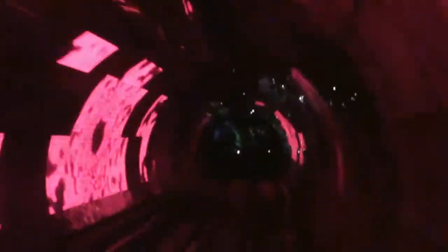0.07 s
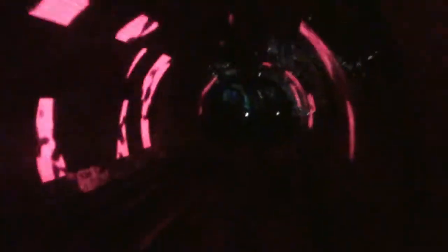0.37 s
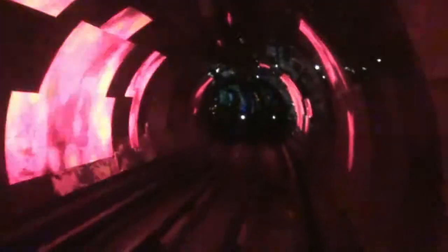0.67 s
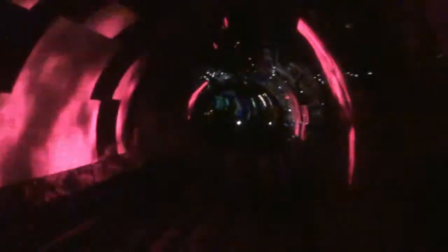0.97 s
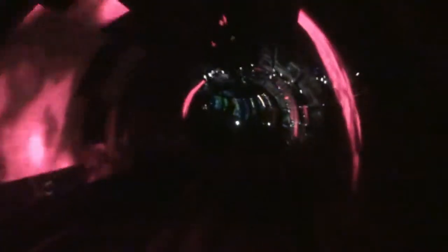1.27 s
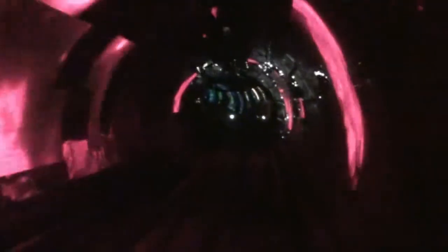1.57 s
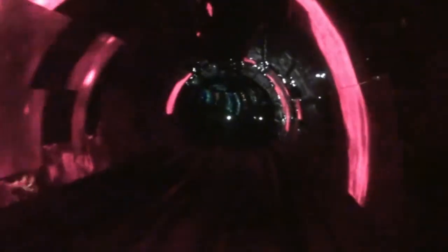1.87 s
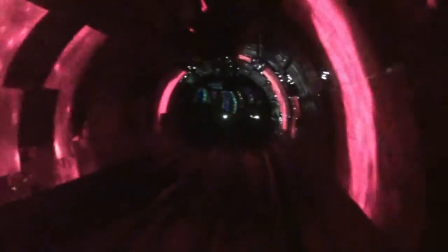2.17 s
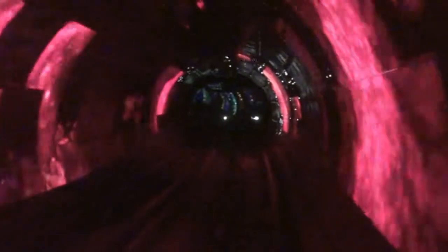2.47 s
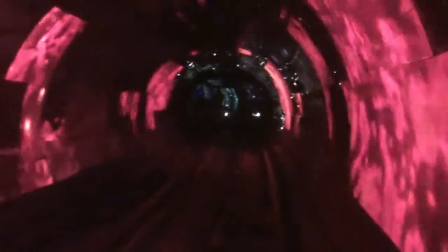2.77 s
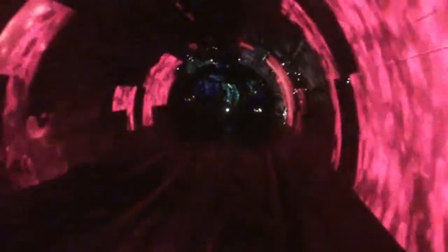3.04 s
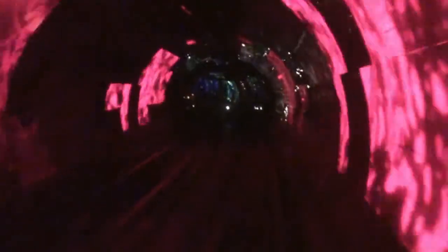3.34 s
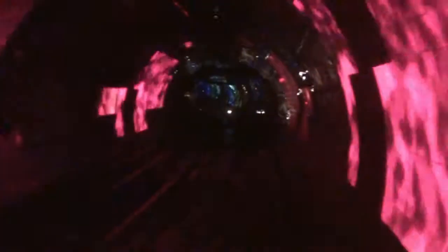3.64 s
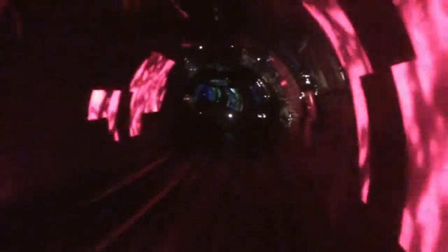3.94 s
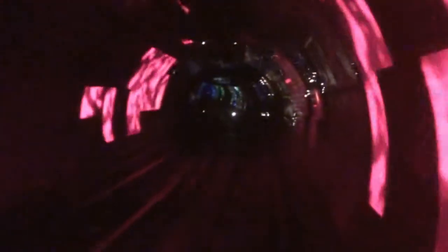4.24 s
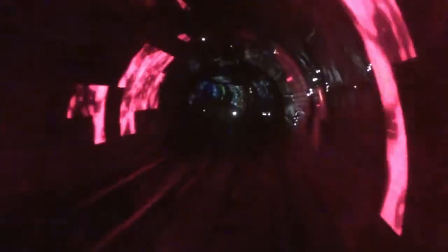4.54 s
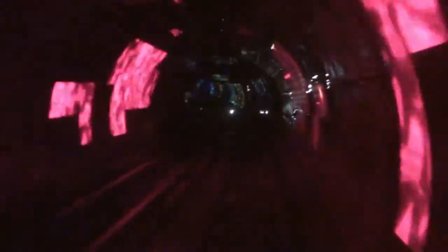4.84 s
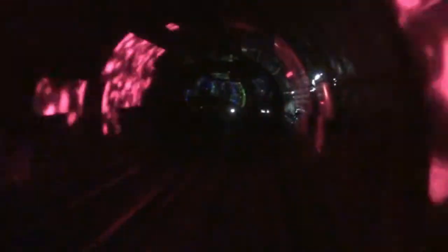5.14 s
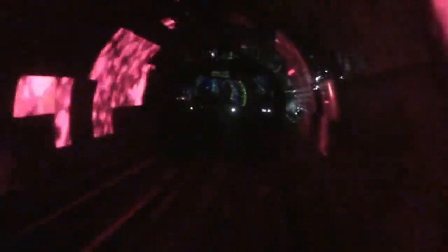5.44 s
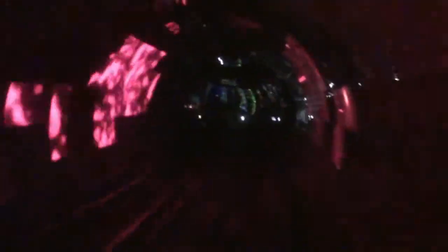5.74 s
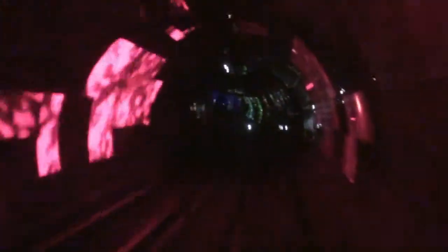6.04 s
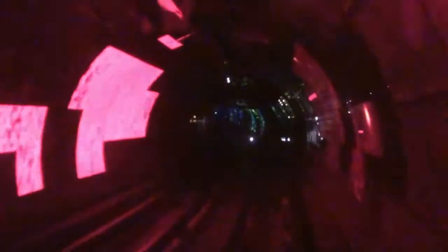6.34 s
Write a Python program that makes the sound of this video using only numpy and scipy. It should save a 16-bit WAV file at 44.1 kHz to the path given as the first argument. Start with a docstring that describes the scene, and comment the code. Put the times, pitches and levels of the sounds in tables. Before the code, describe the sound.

Steady low rumble inside a ride car rolling on rails, broken midway by three sharp metal knocks, with faint ticks and hiss.

```python
"""The rumble of a small closed ride car rolling through a tunnel, heard from inside the cabin.
The wheels force the resonances of cabin air and panels into broadband vibration, with a roar above;
single lightly damped panels hum briefly. Midway the running gear knocks and clashes three times over
rough track, and the cabin reverberates. Loose fittings tick and rub, grit hisses under the wheels,
and the rail sings faintly."""
import sys
import numpy as np
from scipy import signal
from scipy.fft import rfft, irfft
from scipy.io import wavfile
from scipy.ndimage import uniform_filter1d, minimum_filter1d

SR = 44100
rng = np.random.default_rng(int(sys.argv[2]) if len(sys.argv) > 2 else 0)


def to_wav(s):
    """Save 16-bit WAV."""
    ch = np.atleast_2d(s).T  # columns
    pcm = np.round(np.clip(ch, -1, 1) * 32767)  # PCM
    wavfile.write(sys.argv[1], SR, pcm.astype(np.int16))


N = 282416
TIME = np.arange(N) / SR
AGE = TIME[:SR // 2]   # seconds since the onset of a short event
FREQS = np.maximum(np.fft.rfftfreq(N, 1 / SR), 1)
SIDES = np.array([[1], [-1]])   # left, right

# level difference between the ears: frequency_hz, left_minus_right_db
BALANCE = [(35, -9), (60, -7.5), (110, -4.5), (200, -5), (380, 0), (1300, -0.5), (4400, 0), (15000, 0)]


def from_db(db):
    """Amplitude grows tenfold for every 20 dB."""
    return 10 ** (np.asarray(db) / 20)


def rms_one(x):
    """Normalisation: the mean of the two channels gets rms 1."""
    return x / np.sqrt(np.mean(x.mean(0) ** 2) + 1e-20)


def in_time(points):
    """Linear interpolation of a table over time."""
    return np.interp(TIME, *np.transpose(points))


def at_hz(points, hz=FREQS):
    """Interpolation of a table over log frequency."""
    known, values = np.transpose(points)
    return np.interp(np.log(hz), np.log(known), values)


def between(low_hz, high_hz):
    """Magnitude response of a steep band-pass."""
    return 1 / np.sqrt((1 + (low_hz / FREQS) ** 24) * (1 + (FREQS / high_hz) ** 24))


def swell(centre_s, half_s):
    """Gaussian envelope of height 1, down to 1/e at half_s from its centre."""
    return np.exp(-np.minimum(((TIME - centre_s) / half_s) ** 2, 50))


def flutter(per_s):
    """Random modulation: normal values joined by straight lines."""
    values = rng.standard_normal(2048)
    return np.interp(TIME * per_s, np.arange(len(values)), values)


def resonance(x, hz, width_hz):
    """A damped oscillator: two poles, gain 1 at the peak."""
    radius = np.exp(-np.pi * width_hz / SR)
    zeros = (1 - radius ** 2) / 2 * np.array([1, 0, -1])
    poles = [1, -2 * radius * np.cos(2 * np.pi * hz / SR), radius ** 2]
    return signal.lfilter(zeros, poles, x + 1e-18 * np.cos(np.arange(N)))


def ringing(force, hz, width_hz, ring_db):
    """A struck part emphasises its own natural frequency."""
    return force + from_db(ring_db) * resonance(force, hz, width_hz)


def coloured(force, colour):
    """A minimum-phase filter of unit power gain shapes the spectrum causally."""
    gain = from_db(at_hz(colour))
    cepstrum = irfft(np.log(gain / np.sqrt(np.mean(gain ** 2))), N)
    causal_fold = 1 + np.sign(N / 2 - np.arange(N)) * (np.arange(N) > 0)
    return irfft(rfft(force) * np.exp(rfft(cepstrum * causal_fold)), N)


def cabin_noise(gain, coherence=None):
    """Partly coherent stereo noise of rms 1: by default, long waves reach both ears nearly alike."""
    # likeness of the sound at the two ears: frequency_hz, coherence
    cabin_coherence = [(60, 0.94), (130, 1), (200, 0.95), (300, 0.68), (640, 0.66), (3100, 0.68),
                       (7000, 0.5), (10000, 0.89), (13000, 1)]
    # phase difference between the ears: frequency_hz, left_lead_rad
    phase_lead = [(130, -0.074), (340, 0.4), (600, -0.62), (860, -0.47), (1120, 0.58), (1800, 0.26),
                  (6000, 0.14)]
    mid, side = rfft(rng.standard_normal((2, N)))
    alike = np.clip(at_hz(cabin_coherence if coherence is None else coherence), 0, 1)
    pair = np.sqrt(1 + alike) * mid + SIDES * np.sqrt(1 - alike) * side
    placement = from_db(SIDES * at_hz(BALANCE) / 2) * np.exp(.5j * SIDES * at_hz(phase_lead))
    return rms_one(irfft(pair * placement * gain, N))


def panel_ripple(depth_db, spacing_hz):
    """Modal overlap: crowded panel resonances form a fixed, irregular ripple of gain."""
    heights = rng.uniform(-1, 1, 4096)
    return from_db(depth_db * np.interp(FREQS / spacing_hz, np.arange(len(heights)), heights))


def reverberation(x, wet_db, pan_db):
    """Direct sound plus exponentially decaying reflections from the glass walls; treble dies first."""
    # time the cabin takes to decay by 60 dB: frequency_hz, t60_s
    decay_times = [(500, 0.95), (2000, 0.36), (6000, 0.31), (14000, 0.27)]
    # likeness at the ears of reflections from all sides: frequency_hz, coherence
    echo_coherence = [(500, .6), (3000, .35), (8000, .1), (12000, .75)]
    edges_hz = np.geomspace(200, 18000, num=6)
    diffuse = rfft(cabin_noise(np.ones(len(FREQS)), echo_coherence))
    echo = 0
    for low, high in zip(edges_hz, edges_hz[1:]):
        band = irfft(diffuse * between(low, high), N)[:, :len(AGE)]
        echo = echo + band * from_db(-60 * AGE / at_hz(decay_times, np.sqrt(low * high)))
    echo = echo / np.sqrt(np.sum(echo.mean(0) ** 2))
    direct = x * from_db(SIDES * pan_db / 2)
    return direct + from_db(wet_db) * signal.fftconvolve(x[None], echo, axes=1)[:, :N]


def rail_whine():
    """Narrow-band resonance: the wheels' faint singing on the rail comes and goes."""
    band = resonance(cabin_noise(between(5000, 8000)), hz=6430, width_hz=220)
    return from_db(-64.5) * swell(centre_s=2.5, half_s=1.8) * rms_one(band)


def grit_hiss():
    """Fine grit under the wheels radiates thin, slightly unsteady broadband noise."""
    # strength of the hiss: time_s, level_db
    levels = [(0, -46.5), (.4, -50.5), (.68, -48.5), (1.0, -50), (1.7, -47), (2.15, -49.5), (2.8, -51.5),
              (3.1, -50.5), (4.2, -52), (4.4, -48.5), (4.7, -53.5), (5.3, -50), (5.75, -50), (6.05, -52),
              (6.4, -50)]
    # spectrum of the hiss: frequency_hz, gain_db
    spectrum = [(1200, -4.5), (1800, 7.5), (2400, 4), (3300, 1.5), (5000, -2), (6100, -5.5), (6550, -9.5),
                (6900, -6.5), (10500, -10.5), (12500, -17.5), (15500, -15.5)]
    colour = from_db(at_hz(spectrum)) * panel_ripple(depth_db=2.5, spacing_hz=29.47)
    flicker_db = flutter(per_s=44)
    return from_db(in_time(levels) + flicker_db) * cabin_noise(colour)


def gritty(start_s, envelope):
    """Micro-impacts: noise under an envelope, its grain sizes spread log-normally by 4 dB."""
    size, value = rng.standard_normal((2, len(envelope)))
    grains = value * from_db(4 * size)
    return np.pad(envelope * grains / grains.std(), (round(start_s * SR), N))[:N]


def contact(start_s, level_db, decay_s, rise_s):
    """One touch of metal: a burst of micro-impacts that decays exponentially."""
    envelope = (1 - np.exp(-AGE / rise_s)) * np.exp(-AGE / decay_s)
    return from_db(level_db) * gritty(start_s, envelope)


def knock(start_s, level_db, decay_s):
    """An impact: an impulse 15.5 dB above the level of the short chatter that follows."""
    force = contact(start_s, level_db, decay_s, rise_s=.00032)
    force[round(start_s * SR)] += from_db(level_db + 15.5)
    return force


def scrape(start_s, level_db, rise_s, length_s, release_s=.0029):
    """Sliding friction: metal bites, drags for a moment and lets go."""
    bite = 1 - np.exp(-AGE / rise_s)
    release = np.exp(-np.maximum(AGE - length_s, 0) / release_s)
    return from_db(level_db) * gritty(start_s, bite * release)


def fittings(metal_spectrum):
    """Light impact and friction: small loose parts tick and rub."""
    # taps of loose fittings: start_s, level_db
    taps = [(.326, -42), (.405, -45), (.482, -45), (.600, -45), (.665, -46), (.70, -46), (1.526, -37),
            (1.72, -49), (3.248, -45), (3.358, -50.5), (3.400, -45), (3.452, -43), (3.486, -44),
            (3.503, -43), (3.99, -44), (4.345, -45), (4.410, -40), (5.30, -44.5), (5.589, -45),
            (5.615, -46)]
    # rubbing of loose parts: start_s, level_db, decay_s
    rustles = [(.06, -62, .083), (.20, -50, .05), (5.301, -46.5, 0.063), (5.60, -56, .04),
               (5.718, -48.5, 0.13), (5.89, -47, 0.033), (6.099, -47, .06), (6.27, -46, 0.059)]
    # spectrum of the rubbing: frequency_hz, gain_db
    rub_spectrum = [(1500, -1), (3000, -1), (4500, -3), (6500, -5), (9500, -15.5), (12000, -26),
                    (15500, -30)]
    ticks = sum(contact(s, db, decay_s=.0024, rise_s=.0004) for s, db in taps)
    rubs = sum(contact(s, db, decay_s, rise_s=.0044) for s, db, decay_s in rustles)
    return coloured(ticks, metal_spectrum) + coloured(rubs, rub_spectrum)


def panel_hums():
    """Light damping: a jolted panel swells into a nearly pure, wavering tone and fades."""
    # humming panels: centre_s, half_length_s, pitch_hz, glide_hz_per_s, level_db
    hums = [(.33, 0.073, 183, 1, -17), (.42, 0.078, 296, 1.5, -20), (.7, 0.17, 260, 0.5, -29),
            (1.39, 0.1, 183, 0.5, -22), (1.597, .12, 298, 0.5, -29), (1.9, 0.048, 184, 0.5, -17),
            (2.38, 0.22, 182.5, 0, -17), (2.68, 0.08, 158, 0.5, -17), (2.69, .06, 183, -1, -19),
            (2.84, 0.1, 130, 1, -15), (3.1, 0.1, 183, 0.5, -21), (3.58, .17, 182.5, 0, -21.5),
            (3.93, 0.094, 263, -0.5, -26), (3.98, 0.19, 184, 0, -20.5), (4.72, 0.1, 131, 1, -11.5),
            (4.88, 0.13, 217, -110, -19), (5.18, 0.076, 225, -1.5, -25), (5.51, 0.098, 296, -0.5, -26),
            (5.67, 0.14, 185, 2, -25), (5.83, 0.072, 156, 0.5, -17.5), (6.14, 0.12, 227, 1, -19),
            (6.27, 0.097, 184, 0, -14), (6.32, 0.091, 204, -2, -20)]
    out, waver_hz = 0, 1.5
    for centre_s, half_s, hz, glide, level_db in hums:
        pitch_hz = hz + glide * (TIME - centre_s) + waver_hz * flutter(per_s=15)
        tone = np.sqrt(2) * np.sin(2 * np.pi * (np.cumsum(pitch_hz) / SR + rng.random()))
        gain = from_db(level_db + SIDES * at_hz(BALANCE, hz) / 2)
        out = out + gain * swell(centre_s, half_s) * tone
    return out


def running_gear(metal_spectrum):
    """Impact and friction excite metal resonances: dull knocks and bright scraping clashes."""
    # blows of the running gear: start_s, level_db, decay_s, ring_hz, ring_db
    blows = [(2.234, -29.5, .003, 2040, 8), (2.238, -24.5, 0.011, 2040, 11), (2.263, -31, .012, 1900, 0),
             (2.284, -31, .006, 2100, 1), (2.303, -37, .008, 1800, -1), (2.488, -27.5, 0.01, 3700, 2),
             (2.499, -25, 0.0019, 1510, 4), (2.553, -27, 0.0085, 1750, 1.5), (2.563, -23, .001, 1800, 0),
             (3.019, -24, 0.0017, 1700, -7), (3.034, -27.5, .005, 1580, 14), (3.047, -27, 0.0087, 1430, 9),
             (3.059, -22.5, 0.0035, 1790, 4), (3.073, -22.5, .002, 1750, 1), (3.088, -28, .004, 1560, -4),
             (3.111, -32, .005, 1900, 2), (3.131, -30, 0.0067, 1400, -1), (3.172, -39, 0.025, 2200, 5)]
    # spectrum of the blows: frequency_hz, gain_db
    knock_spectrum = [(300, -9), (900, 5), (1400, -3.5), (1950, -5), (2400, -10), (3400, -11),
                      (4500, -12.5), (5300, -18), (5900, -25), (11000, -38), (15500, -47)]
    # metal dragging on metal: start_s, level_db, rise_s, length_s, cutoff_hz, ring_hz, ring_db
    scrapes = [(2.259, -38, .001, .009, 6500, 7760, 13), (2.299, -28.5, 0.0024, 0.024, 16000, 12000, 4),
               (2.305, -29, .0006, .004, 10000, 7000, 2), (2.362, -35.5, .002, .01, 8000, 7700, 5),
               (2.491, -41, .001, .006, 4000, 5200, -4), (2.527, -29.5, 0.023, 0.023, 5000, 4250, -8),
               (2.549, -38, 0.0022, 0.016, 11000, 2790, 7), (2.559, -37, .0008, .005, 18000, 10900, 14),
               (2.576, -41.5, .003, 0.026, 12000, 9600, 4), (2.62, -48, .002, .012, 14000, 11000, 6),
               (3.017, -39, .0004, .002, 6000, 6300, 8), (3.029, -40, .002, 0.0098, 13000, 10300, 2),
               (3.047, -29, .0015, .005, 6500, 4500, 0), (3.054, -31.5, .0008, .005, 11000, 9500, 4),
               (3.057, -33, .0006, 0.0034, 11000, 7940, 2), (3.082, -44, .002, .014, 9000, 9500, 3),
               (3.149, -43, .002, .012, 5000, 3800, 2), (3.188, -54, .003, .03, 3000, 3800, -2)]
    knocks = sum(ringing(knock(s, db, decay_s), hz, width_hz=290, ring_db=ring_db)
                 for s, db, decay_s, hz, ring_db in blows)
    clashes = 0
    for s, db, rise_s, length_s, cutoff_hz, hz, ring_db in scrapes:
        drag = ringing(scrape(s, db, rise_s, length_s), hz, width_hz=180, ring_db=ring_db)
        low_pass = signal.butter(1, cutoff_hz, fs=SR)
        clashes = clashes + signal.lfilter(*low_pass, drag)
    return coloured(knocks, knock_spectrum) + coloured(clashes, metal_spectrum)


def car_response():
    """Transfer gain from wheels to cabin air: modes add in power to a broad background."""
    # resonances of cabin, panels and wheels: frequency_hz, width_hz, peak_db
    modes = [(51, 3.6, 1), (76, 5.8, -3), (93.2, 21, 3), (128.3, 11.6, -2.5), (157.9, 12.1, -8.5),
             (184.9, 15.6, -7), (222.1, 15.2, -10.5), (264, 10.6, -12.5), (293.8, 13.3, -15),
             (337.7, 29.5, -15.5), (406.3, 10.3, -17.5), (436.3, 22, -19), (481, 12, -16), (526, 17.5, -22),
             (575.5, 10.8, -17.5), (611.8, 15.4, -21), (655, 24, -26), (700, 52, -31.5), (759, 22.5, -22.5),
             (801.5, 29, -26), (836.5, 19, -22), (883.5, 16, -24.5), (933.4, 15.3, -20.5), (950, 28, -23.5),
             (1000.7, 13, -22), (1027, 8.5, -22), (1100, 20.5, -30.5)]
    # response between the resonances: frequency_hz, gain_db
    body = [(15, -47.5), (30, -45), (65, -24.5), (100, -25.5), (370, -31), (700, -30.5), (1030, -48),
            (1200, -38.5)]
    power = from_db(at_hz(body)) ** 2
    for hz, width_hz, peak_db in modes:
        detuning = (FREQS - hz) / width_hz
        power = power + (from_db(peak_db) / (1 + 1.67 * detuning ** 2)) ** 2
    return np.sqrt(power)


def wandering(x):
    """Frequency modulation: resonances drift slightly at random, as under a varying load."""
    position = np.cumsum(1 + .00695 * flutter(per_s=4))
    return np.array([np.interp(position, np.arange(N), side, period=N) for side in x])


def groaning(x, low_hz, high_hz):
    """Selective excitation: a patch of uneven track briefly makes one resonance stand out."""
    # briefly excited resonances: centre_s, half_length_s, frequency_hz, width_hz, gain_db
    groans = [(.1, 0.29, 454, 71, 5), (.6, .9, 806, 36, 3), (0.898, 0.76, 1216, 140, -4.5),
              (1.35, 0.13, 698, 40, -1.5), (1.39, .15, 774, 28, -0.5), (1.5, 0.21, 1390, 160, -2),
              (1.6, 0.23, 990, 82, -11), (2.237, 0.083, 574, 30, 4), (2.402, 0.04, 415, 38, 6.5),
              (2.615, 0.055, 422, 60, -3.5), (2.612, 0.13, 635, 76, -2.5), (2.78, 0.091, 433, 20, 9),
              (2.798, 0.19, 1050, 54, 0), (2.984, 0.063, 630, 18, 2.5), (2.992, 0.05, 1200, 90, 10.5),
              (3.186, 0.058, 965, 49, 13), (3.189, .06, 1200, 70, -0.5), (3.195, 0.078, 582, 11, -1),
              (3.417, .04, 930, 90, 0), (3.473, 0.14, 1100, 92, 7), (3.552, 0.17, 1380, 130, -10),
              (3.7, 0.055, 442, 40, 5), (3.722, 0.16, 518, 49, 4.5), (4.203, 0.11, 935, 25, 3.5),
              (4.643, 0.056, 345, 30, -5), (4.635, .04, 850, 30, 4), (4.785, 0.12, 735, 60, -2.5),
              (4.804, 0.41, 856, 35, -4), (4.922, .33, 1400, 130, -0.5), (5.329, .1, 892, 35, 3),
              (5.547, .1, 2080, 180, -7), (6.05, .08, 2030, 150, 3), (6.06, .06, 334, 43, 0.5),
              (6.1, .2, 570, 30, -3.5)]
    out = x
    for centre_s, half_s, hz, width_hz, gain_db in groans:
        if low_hz < hz < high_hz:
            out = out + from_db(gain_db) * swell(centre_s, half_s) * resonance(x, hz, width_hz)
    return out


def steady(x, window_s):
    """Division by the running rms evens out slow swells and keeps the fast flutter."""
    size = int(window_s * SR)
    power = uniform_filter1d(uniform_filter1d(x.mean(0) ** 2, size), size)
    return rms_one(x / np.sqrt(np.maximum(power, 0) + .039))


def rolling_rush():
    """Above the wheel resonances, rolling noise falls off with frequency into a soft rush."""
    # spectrum of the rush: frequency_hz, gain_db
    spectrum = [(900, -11), (1130, -4.5), (1250, -0.5), (1540, -6.5), (2000, -12), (2400, -18), (4000, -27),
                (8000, -47.5)]
    colour = from_db(at_hz(spectrum)) * panel_ripple(depth_db=7, spacing_hz=19)
    return groaning(cabin_noise(colour), low_hz=1150, high_hz=3000)


def rumble():
    """Forced vibration: the track shakes the car's modes, each band swelling in its own way."""
    # track roughness against ordinary running: time_s, level_db
    roughness = [(0, -2.5), (.28, -3), (.85, -1.5), (1.24, 1.5), (1.7, 0.5), (2.1, 1), (2.75, -0.5),
                 (3.4, -0.8), (3.68, -0.3), (4.2, 1), (4.52, 0.5), (4.72, 8), (4.92, 5), (5.2, 3.5),
                 (5.65, 0), (6.0, -0.7), (6.4, 0)]
    # bumps that excite the wheels: centre_s, roar_lift_db, ring_lift_db
    bumps = [(.26, 6, 3.5), (.49, 3, 2.5), (.66, 0, 3.5), (1.25, 2, 3), (1.48, -2, 2), (1.95, 6, 1),
             (2.23, 5.5, 1), (2.38, 9, 3.5), (2.61, 11.5, 4), (2.78, 9.5, 3), (2.87, 1.5, 0.5),
             (3.08, 4.5, -0.5), (2.973, 10, 4), (3.19, 10.5, 8.5), (3.43, 3, 3.5), (4.38, 2, 2),
             (5.78, 3.5, 0.5), (5.951, 5.5, 4), (6.17, 4.5, 3)]
    # jolts that make the cabin air boom: centre_s, deep_lift_db, upper_lift_db
    jolts = [(.15, 5, -2), (.52, 5.5, -3), (1.98, 1.5, 1.5), (2.52, -1, 5.5), (2.77, 3, 8), (3.1, 1, 8.5),
             (3.69, 4, -8), (4.19, 5.5, -14), (4.71, -2.5, 1.5), (5.03, -0.5, 4.5), (5.46, 4.5, -1.5),
             (6.0, 5, -3)]
    # lurches on the suspension: centre_s, lift_db
    lurches = [(.42, 2), (1.14, 2), (1.42, 5), (2.03, 7), (3.02, 6.5), (3.42, 4), (4.0, 11), (5.7, 8),
               (6.37, 5)]
    # swells of the panels' drone: centre_s, half_length_s, lift_db
    panel_swells = [(.372, 0.29, 3.5), (0.97, 0.2, 3), (1.36, 0.036, 3.5), (1.953, 0.063, 0.5),
                    (2.386, 0.34, 3), (2.647, 0.045, 6.5), (3.0, 0.12, 4.5), (3.912, 0.04, 3.5),
                    (4.894, 0.11, 1.5), (5.246, 0.25, 1.5), (6.27, 0.63, 3.5)]
    response, track_db = car_response(), in_time(roughness)
    bump_db, ping_db = sum(np.outer(dbs, swell(s, half_s=.076)) for s, *dbs in bumps)
    deep_db, upper_db = sum(np.outer(dbs, swell(s, half_s=.071)) for s, *dbs in jolts)
    lurch_db = sum(db * swell(s, half_s=.08) for s, db in lurches)
    panel_db = sum(db * swell(s, half_s) for s, half_s, db in panel_swells)
    sway_db = 2 * flutter(per_s=8.1)   # the suspension rocks
    wobble_db = .94 * flutter(per_s=24)   # the wheels' contact wavers

    def band(low_hz, high_hz, level_db, window_s):
        """Random excitation of the modes within one frequency band."""
        noise = wandering(cabin_noise(response * between(low_hz, high_hz)))
        return from_db(level_db) * steady(groaning(noise, low_hz, high_hz), window_s)

    body_shudder = band(15, 40, -47, window_s=.2)
    thud = band(44, 62, -30 - .49 * track_db + lurch_db + sway_db, window_s=.12)
    deep_boom = band(81.3, 107, -18.5 + deep_db, window_s=.15)
    upper_boom = band(118.8, 144.3, -19 + upper_db, window_s=.13)
    drone = band(147, 362, -21 + .55 * track_db + panel_db, window_s=.11)
    roar = band(387, 662, -29 + .58 * track_db + bump_db + wobble_db, window_s=.1)
    ring = band(684, 1277, -31.5 + track_db + ping_db + wobble_db, window_s=.11)
    rush = from_db(-43 + .53 * track_db + .24 * bump_db) * rolling_rush()
    return body_shudder + thud + deep_boom + upper_boom + drone + roar + ring + rush


def scene():
    """Superposition: rumble and hiss fill the cabin; blows and ticks come from slightly left."""
    # spectrum of bright metal contact, for clashes and ticks: frequency_hz, gain_db
    metal_spectrum = [(600, -4.5), (1500, -5), (2900, -3.5), (4200, 0.5), (5300, -6), (6500, -0.5),
                      (8000, -3.5), (9100, -4.5), (11800, -7), (12700, -11), (13700, -20), (14500, -13),
                      (15200, -23)]
    blows = reverberation(running_gear(metal_spectrum), wet_db=-1, pan_db=3.8)
    ticks = reverberation(fittings(metal_spectrum), wet_db=-3.5, pan_db=2.5)
    return rumble() + panel_hums() + rail_whine() + grit_hiss() + blows + ticks


def record(dry):
    """Peak limiting holds the highest crests; the ends are faded and a low-pass cuts the top."""
    ceiling, limiter_s, fade_s, cutoff_hz = .89, .013, .003, 15750
    size = int(limiter_s * SR)
    allowed_gain = minimum_filter1d(ceiling / np.maximum(np.abs(dry).max(0), ceiling), size)
    limited = dry * uniform_filter1d(uniform_filter1d(allowed_gain, size // 2), size // 2)
    from_end_s = np.minimum(TIME, TIME[::-1])
    fade = np.sin(np.pi / 2 * np.clip(from_end_s / fade_s, 0, 1)) ** 2
    low_pass = signal.ellip(12, .1, 90, cutoff_hz, fs=SR, output="sos")
    return signal.sosfilt(low_pass, limited * fade)


dry = scene()
out = record(dry)
to_wav(out)
```